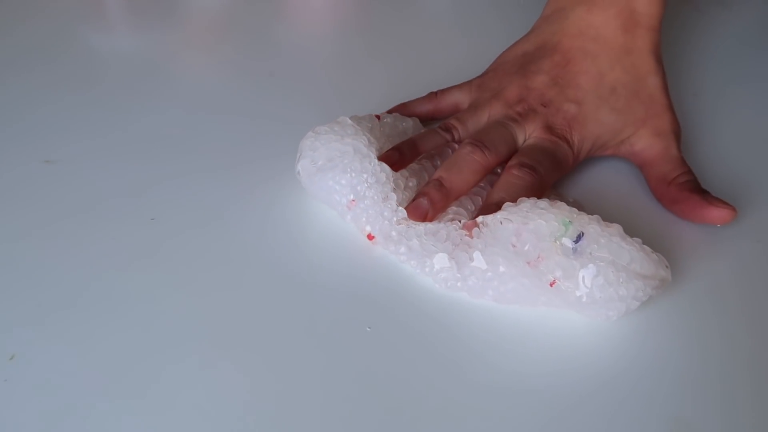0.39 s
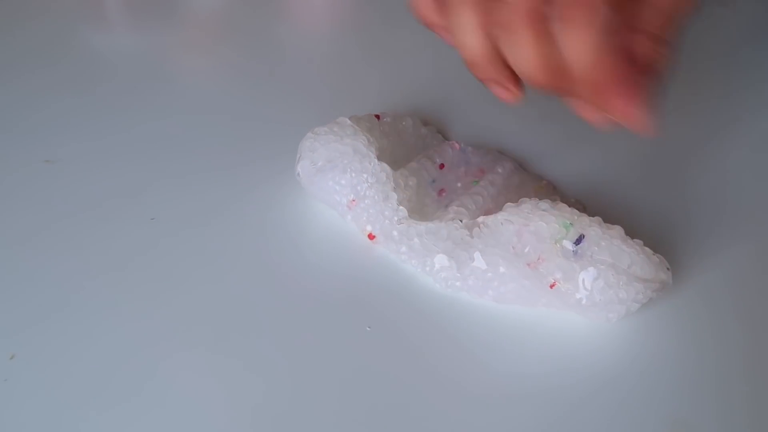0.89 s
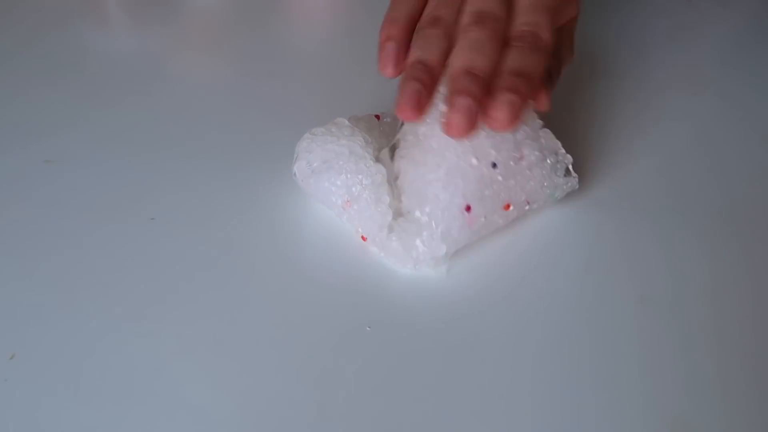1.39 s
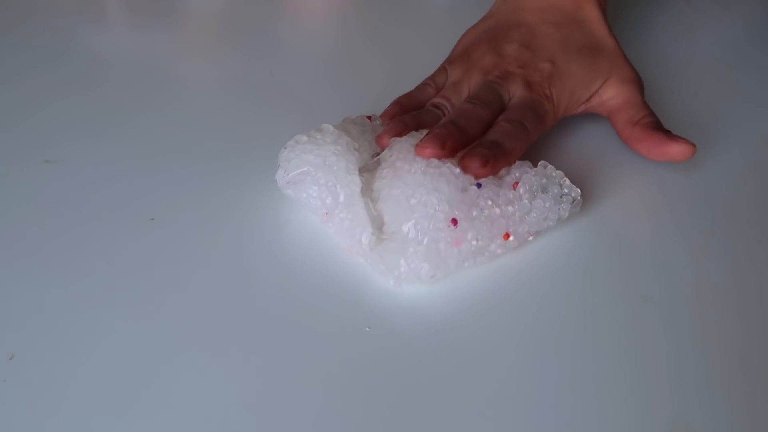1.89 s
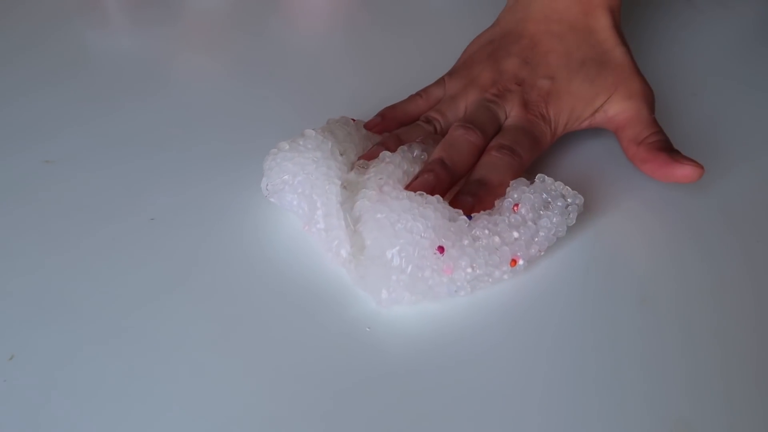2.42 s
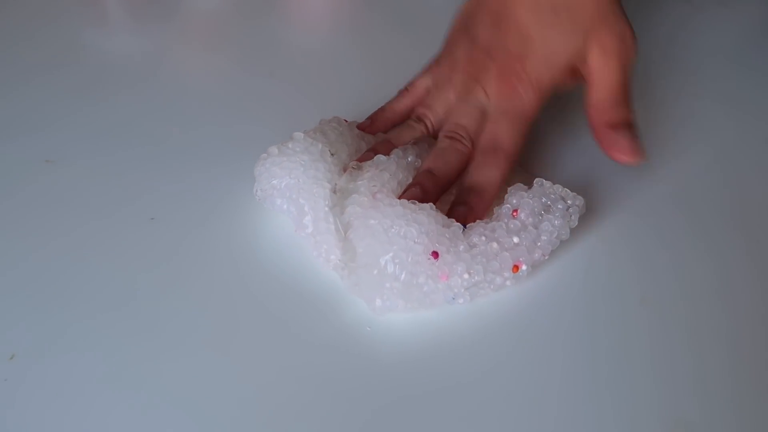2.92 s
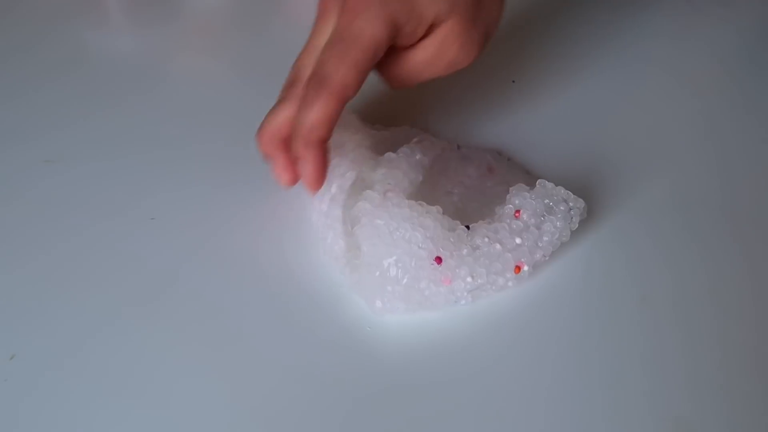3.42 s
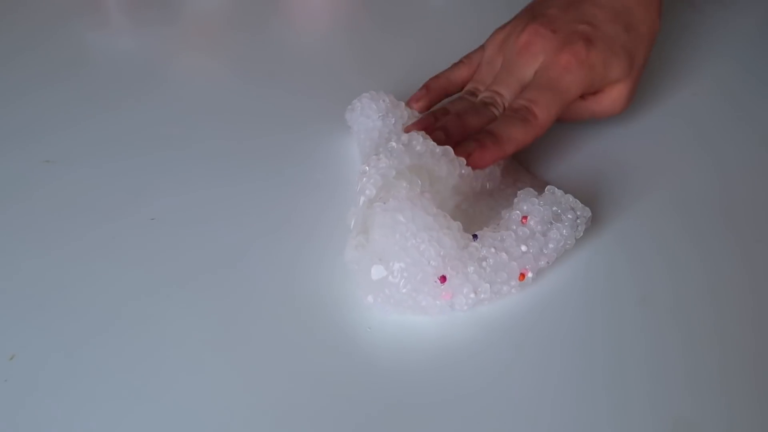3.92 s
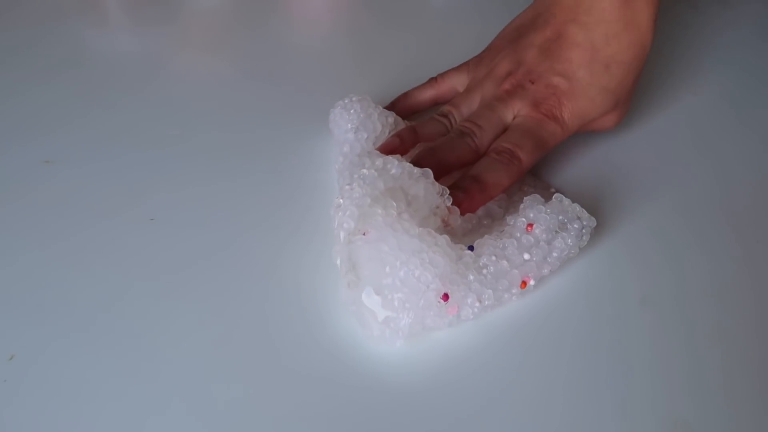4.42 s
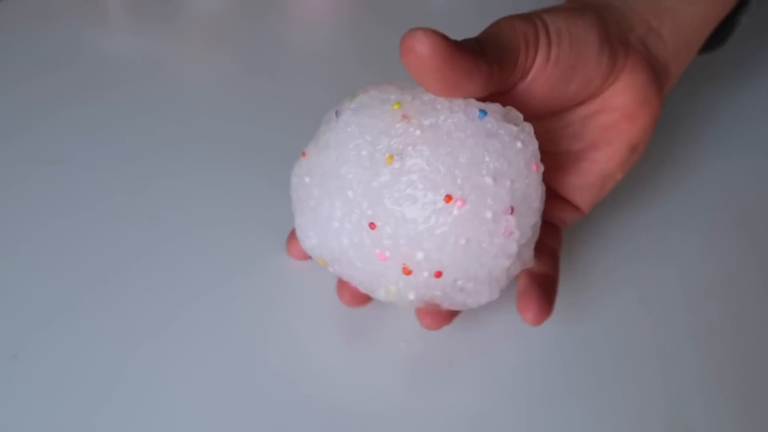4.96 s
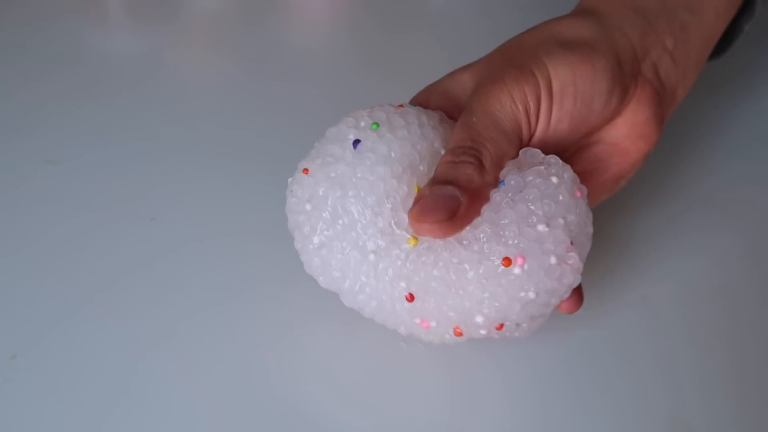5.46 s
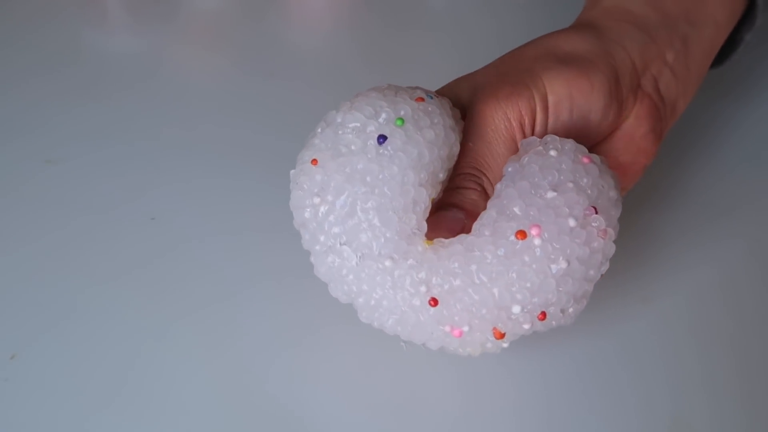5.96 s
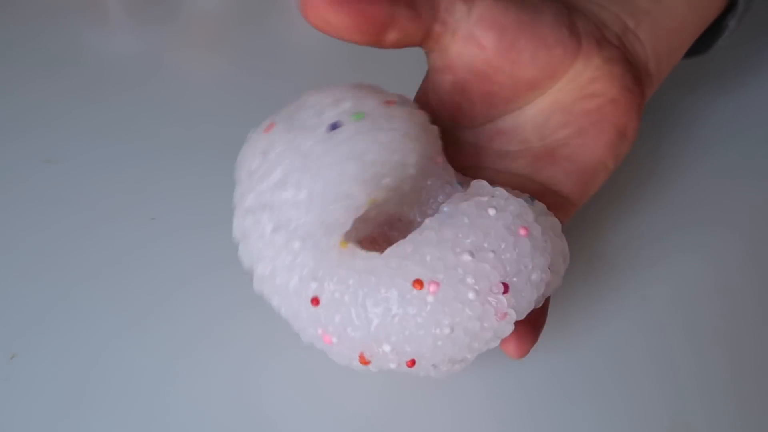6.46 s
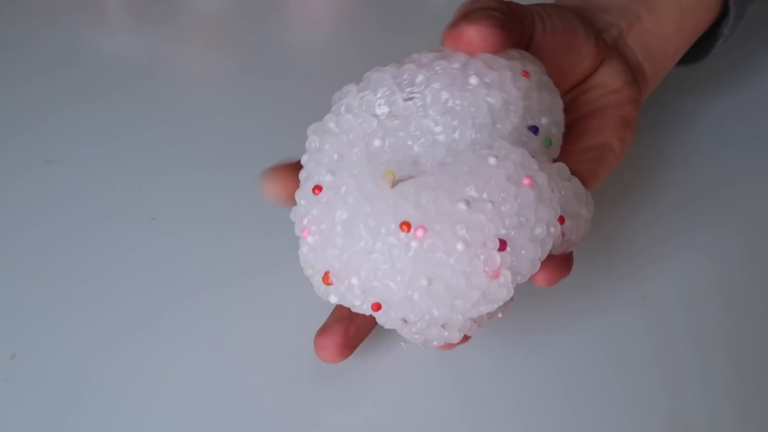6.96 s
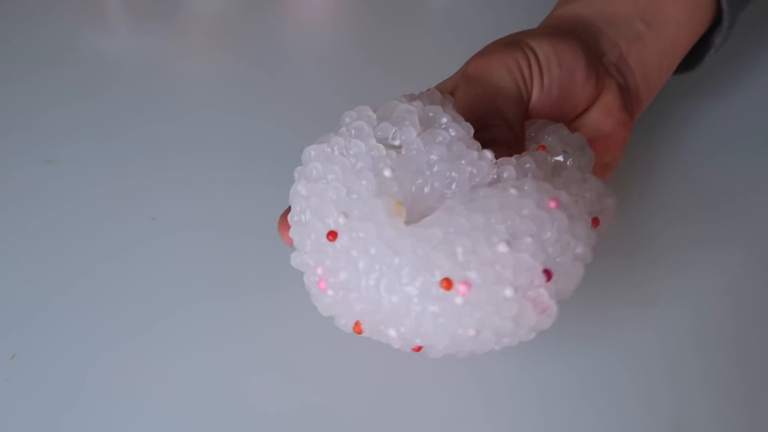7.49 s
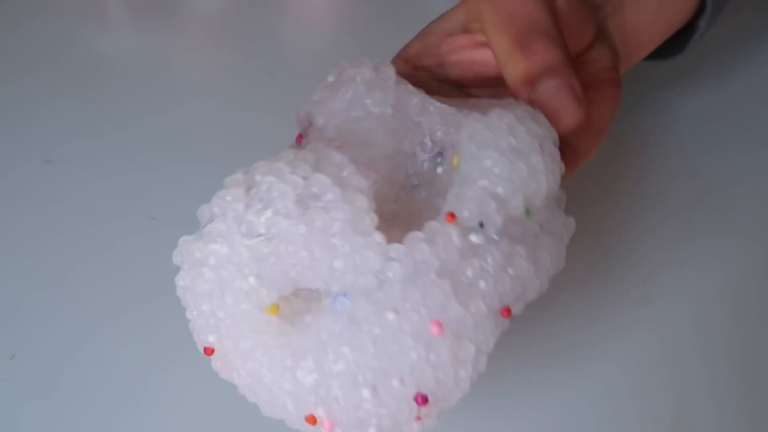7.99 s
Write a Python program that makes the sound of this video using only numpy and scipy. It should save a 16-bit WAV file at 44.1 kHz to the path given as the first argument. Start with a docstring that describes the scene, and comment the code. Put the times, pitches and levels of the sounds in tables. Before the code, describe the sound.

Irregular bright clicks and sticky crackling from beady slime worked by hand on a table, with low bumps, squelches and faint hiss.

```python
"""Bead-filled slime worked by hand

A hand presses, folds and peels bead-filled slime on a table, close to a microphone.
Bursting air pockets pop as damped resonators with noise snaps; parting threads crackle as many tiny rings
over a fizz; folds and torn pockets pass air as band noise; peels shake and knock the table.
A small room reflects the sound over hiss and hum; a splice cuts off earlier pulls and reverberation."""
import sys
import numpy as np
from scipy import signal
from scipy.fft import rfft, irfft, next_fast_len
from scipy.io import wavfile
from scipy.ndimage import map_coordinates

SR = 44100
rng = np.random.default_rng(int(sys.argv[2]) if len(sys.argv) > 2 else 0)


def gain_from_decibels(decibels):
    """Convert decibel values to linear amplitude factors."""
    exponent = np.asarray(decibels, float) / 20
    return 10 ** exponent


def put_to_file(sound):
    """Save the sound as 16-bit audio at rate SR, in the file named by the first command-line argument."""
    columns = np.atleast_2d(sound).T  # one column per channel
    safe = np.clip(columns, -1, 1)
    whole_steps = np.round(safe * 32767)
    wavfile.write(sys.argv[1], SR, whole_steps.astype(np.int16))


N = 357651
SPLICE_S = 4.861  # where two moments are joined


def unit(x):
    """Normalisation: scales a signal to rms 1."""
    return x / np.sqrt(np.mean(x ** 2) + 1e-20)


def filtered(x, response):
    """Linear filtering: multiplies the spectrum by a response of frequency."""
    size = next_fast_len(len(x) + 8192)
    spectrum = rfft(x, size) * response(np.fft.rfftfreq(size, 1 / SR))
    return irfft(spectrum, size)[:len(x)]


def colour(points):
    """Spectral envelope: gain interpolated between (Hz, dB) points on a log frequency axis."""
    f, db = np.transpose(points)
    return lambda hz: gain_from_decibels(np.interp(np.log(hz + 1), np.log(f + 1), db))


def resonance(centre_hz, half_width_hz, order):
    """Band-pass resonance: gain 1 at the centre, one half at half_width_hz to either side."""
    return lambda f: 1 / (1 + ((f - centre_hz) / half_width_hz) ** order)


def wobble(rate):
    """Random modulation: a smooth curve through rate random knots a second."""
    knots = rng.standard_normal(int(N * rate / SR) + 4)
    return map_coordinates(knots, [np.arange(N) * rate / SR])


def place(s, shapes):
    """Superposition: sums short shapes, one row each, at their times in seconds."""
    at = np.round(s * SR).astype(int)[:, None] + np.arange(shapes.shape[1])
    return np.bincount(at.ravel(), shapes.ravel(), N + SR)[:N]


def rings(hz, cycles, rise, size):
    """Damped oscillation: sines under envelopes of peak 1, whose decay reaches -60 dB after so many cycles."""
    turn = hz[:, None] * np.arange(size) / SR
    envelope = gain_from_decibels(-60 * turn / cycles) * (1 - np.exp(-turn / rise)) ** 2
    return np.sin(2 * np.pi * turn) * envelope / envelope.max(axis=1, keepdims=True)


def hand(column, lag_s=0):
    """Energy addition: kneading and pulls add in power; column 0 is crackle, 1 table shake, 2 sway."""
    # slow kneading: (time [s], crackle [dB], table shake [dB], sway [dB])
    kneading = np.array([(0, -58.5, -55, -44.5), (0.55, -61.5, -59.5, -53.5), (0.72, -52.5, -51, -58),
                         (0.95, -63, -50.5, -41), (1.1, -68, -56, -56), (1.3, -50.5, -50.5, -48),
                         (2.1, -53, -54, -55.5), (2.5, -56.5, -58, -50.5), (2.9, -58, -58.5, -51),
                         (3.15, -64, -53, -41), (3.38, -67.5, -68, -50), (3.65, -50.5, -47.5, -51),
                         (4.2, -53.5, -54, -44.5), (4.7, -62, -49, -52.5), (4.9, -61, -57, -53),
                         (6.2, -61.5, -62, -55), (6.5, -50, -58, -44), (6.95, -60, -59, -51),
                         (7.8, -55, -62, -55), (8.11, -53.5, -58, -50.5)])
    # peels, folds and presses: (full from [s], held [s], crackle [dB], table shake [dB], sway [dB])
    pulls = [(0.743, 0.088, -36.5, -28, -41), (1.095, 0.045, -64, -44, -38), (1.165, 0.077, -46, -32, -37),
             (1.295, 0.11, -61, -37, -45), (2.905, 0.033, -51.5, -48, -57),
             (2.979, 0.057, -35, -26.5, -37.5), (3.33, 0.032, -64.5, -54.5, -34),
             (3.414, 0.027, -56, -31.5, -48), (3.46, 0.12, -45.5, -36.5, -45), (4.07, 0.023, -63, -48, -42),
             (4.748, 0.035, -36, -21.5, -37), (6.345, 0.069, -37, -55.5, -44.5),
             (6.675, 0.035, -56, -52, -32.5), (6.76, 0.077, -73, -54, -39.5), (6.996, 0.016, -43, -43, -42),
             (7.866, 0.049, -34, -55, -46), (7.955, 0.052, -38, -57, -41)]
    # how fast a pull sets in: (crackle [dB/s], table shake [dB/s], sway [dB/s])
    rise = [552, 1300, 400]
    # how fast it dies after letting go: (crackle [dB/s], table shake [dB/s], sway [dB/s])
    fall = [707, 253, 106]
    t = np.arange(N) / SR
    power = gain_from_decibels(np.interp(t, kneading[:, 0], kneading[:, column + 1])) ** 2
    for start, held, *db in pulls:
        s = start + lag_s
        before = np.maximum(s - t, 0)
        after = np.maximum(t - s - held, 0)
        shape = gain_from_decibels(db[column] - rise[column] * before - fall[column] * after)
        uncut = (t < SPLICE_S) | (s > SPLICE_S)
        power += (shape * uncut) ** 2
    return np.sqrt(power)


def pops():
    """Cavity resonance: each pocket rings; its film snaps and tears as noise and wet slime squelches below."""
    # larger bursting pockets:
    # (time [s], level [dB], cavity pitch [Hz], relative squelch level [dB], relative snap level [dB])
    large_pockets = [(0.0267, -28, 2770, -1, -24), (0.0457, -25, 5830, -11, -19),
                     (0.1444, -32, 2090, 4, -23), (0.1795, -27.5, 2430, -12, -27),
                     (0.3542, -12.5, 3740, -27, 3), (0.6538, -25.5, 6140, -10, -17),
                     (0.6974, -16, 14900, -5, -10), (0.7368, -19.5, 2100, 7, 14),
                     (0.7539, -8, 9800, -10, -7), (0.7605, -9, 10500, -1, -7),
                     (0.7676, -0.5, 13610, -22, 2), (0.773, -3, 14810, -19, -3),
                     (0.7781, -3.5, 7300, -12, 1), (0.7872, -4, 10600, -11, -1),
                     (0.808, 7.5, 10500, -24, 2.5), (0.8157, -6.5, 7200, 1, -1), (0.821, -4, 9100, -9, 4),
                     (1.1965, -14, 6550, -4, 2), (1.208, -14, 6540, -13, -2), (1.2158, -17, 7490, 2, -8),
                     (1.2322, -15, 2560, -1, -18), (1.242, -12.5, 3730, -14, 11),
                     (1.2506, -12.5, 10400, -22, 7), (1.2963, -11.5, 7060, 1, 3),
                     (1.3205, -12.5, 5170, -5, -6), (1.3247, -2.5, 6940, -31, 9),
                     (1.3344, -7, 13350, -30, -3), (1.348, -11.5, 4660, -4, -18),
                     (1.358, -0.5, 15070, -17, -5), (1.3707, -4.5, 14990, -14, -10),
                     (1.3939, -20.5, 4100, 6, 15), (1.4421, -16.5, 4250, 4, 11),
                     (1.4804, -3.5, 4320, -20, 8), (1.4909, -21, 13180, -31, 15),
                     (1.5315, -6, 4100, -10, 0), (1.5486, -13.5, 7060, -25, -13),
                     (1.6166, -15.5, 13400, -36, 1), (1.627, -11, 9300, -28, -1),
                     (1.6387, -18, 4630, -13, -8), (1.6525, -11, 6000, -7.5, -2),
                     (1.6805, -16.5, 6030, -6, -13), (1.7535, -20.5, 3600, -8, -19),
                     (1.7724, -13, 10100, -26, -6), (1.8049, -15, 7300, -3.5, -14),
                     (1.8535, -24, 2650, 2, 10), (1.8681, 1, 5350, -13, -2), (1.9183, -19, 11200, -21, -4),
                     (1.9423, -13.5, 8440, -11, -11), (1.961, -12, 10850, -24, -6),
                     (1.984, -18, 9730, -23, -6), (2.0553, -21, 2540, 0, -26), (2.2637, -26, 11000, -10, 0),
                     (2.3412, -24, 8800, -23, -23), (2.39, -18.5, 6950, -27, -16),
                     (2.399, -19, 3550, -3, -33), (2.591, -24.5, 3420, 2.5, 12),
                     (2.6141, 2.5, 6360, -41, 2), (2.7806, -20.5, 8100, -12, 0),
                     (2.7979, -24, 4400, -21, -16), (2.9027, -28.5, 2440, 2, -24),
                     (2.9115, -22.5, 2500, 3.5, 5), (2.9446, -19.5, 11600, -5, -8),
                     (2.9593, -18, 15420, -22, 2), (2.9827, -13, 6400, -20, 8),
                     (2.9938, 2.5, 13800, -32, 6), (3.0024, -8.5, 4830, -12, -14),
                     (3.011, -3.5, 7490, -3.5, -15), (3.0133, -2, 13780, -30, -2),
                     (3.022, 1.5, 8700, -15, 8), (3.0251, -1.5, 6040, -17, -5),
                     (3.0384, -19, 5040, 6.5, -11), (3.3803, -30, 2200, -3.5, 1),
                     (3.4089, -13.5, 9900, -10, -2), (3.4204, -15, 9000, 3, 4),
                     (3.4631, -11, 10400, -28, 11.5), (3.4924, -15, 13700, -2, -5),
                     (3.5168, -17, 6460, 1, 1), (3.5274, -14, 7100, -2, 2), (3.6954, -9, 8200, -7, -19),
                     (3.8155, -16, 7700, -16, 1), (3.8219, -17, 10900, -35, -4),
                     (3.9195, -11.5, 11000, -10, -4), (3.996, -17, 12400, -35, -11),
                     (4.0193, -17.5, 6980, -1, 7), (4.0413, -19, 7650, -17, 0),
                     (4.0608, -18, 5170, -9.5, 11), (4.1278, -12, 14700, -13, 11.5),
                     (4.2023, -10, 10300, -10, -2), (4.2374, -24, 14900, -17.5, -11.5),
                     (4.336, -31, 2120, 5, -24), (4.4335, -21, 7300, -17, -4), (4.5047, -25, 1250, -2, -21),
                     (4.5505, -10, 3970, -10.5, -24), (4.5896, -14, 5700, -9.5, -5),
                     (4.6812, -23, 1570, -6, -29), (4.7415, -19, 10340, -4, -2),
                     (4.7512, 1.5, 13780, -19, -5), (4.7644, -6, 7300, -25, -9.5),
                     (4.7684, 5.5, 7500, -24, -18), (4.7731, 1, 14640, -26, -4),
                     (4.788, -11, 9900, -18, -5), (4.7923, -9, 11710, -27, -5), (4.8006, 0, 5250, -31, -4),
                     (4.9624, -21.5, 2930, -15.5, 12.5), (5.1853, -10, 13600, -27, -4),
                     (5.2375, -19.5, 3400, -12, 15), (5.3809, -9, 9000, -24, 8),
                     (5.5445, -15.5, 9040, -8, 12), (5.594, -32, 1200, -15, -15),
                     (5.6566, -25.5, 7100, -5.5, 5), (5.6882, -24, 9080, 1, 4),
                     (5.7819, -25.5, 3800, -23, 4), (6.1414, -26.5, 9200, -18, -5),
                     (6.3485, -12.5, 3860, -8, 9), (6.377, -11.5, 2612, 6.5, -15),
                     (6.564, -25, 9390, -7, 7), (6.5918, -20, 9040, -5.5, 2), (6.8823, -26, 8270, -8, 1),
                     (6.9325, -9, 15400, -14.5, -1), (6.9929, -6, 11420, -18, -3),
                     (6.997, -13.5, 13630, -2, -18.5), (7.0058, -11, 13180, -1.5, -6.5),
                     (7.1361, 2.5, 4340, -17, -57), (7.1618, -20, 7500, -17, -15),
                     (7.1837, -17, 8700, -30, 3), (7.2045, -22, 4900, -14.5, 4),
                     (7.2535, -18.5, 4900, -1, -22), (7.3924, -8, 13700, -15.5, -1),
                     (7.438, -23, 12830, -25, -4), (7.4833, -31, 2410, -10, -22),
                     (7.5091, -24, 7380, -15, 5), (7.6523, -20, 8180, -9, -6),
                     (7.7372, -9.5, 7640, -15, -19), (7.848, -22.5, 9000, -10, 8),
                     (7.8727, -17, 7800, -15, 11), (7.8856, -14, 9640, -4, 12),
                     (7.903, -12, 3060, -19.5, -5), (7.907, -8, 9820, -3, -14),
                     (7.9356, -12, 11100, -35, 1), (7.952, -15, 2600, -19, -4), (7.9598, 0, 8550, -21, 1),
                     (7.9625, 3.5, 8500, -17.5, -6), (7.9771, 2.5, 13200, -24, -5),
                     (7.9785, -3, 13000, -25, -6), (7.981, -2, 8610, -11.5, -9),
                     (8.0072, -5, 14900, -20, -11), (8.0113, -6.5, 11890, -14, 7.5)]
    s, db, hz, squelch_db, snap_db = np.transpose(np.vstack([large_pockets, small_pockets()]))
    t, chance = np.arange(300) / SR, rng.standard_normal((len(s), 610))

    cavity = gain_from_decibels(db - 1.0)[:, None] * rings(hz, cycles=6.0, rise=0.48, size=300)
    squelch_hz = 1800 * gain_from_decibels(3.12 * chance[:, 600])
    squelch = gain_from_decibels(db + squelch_db - 6.0)[:, None] * rings(squelch_hz, cycles=3.9, rise=0.21, size=300)

    burst = gain_from_decibels(-60 * t / 0.0032) * (t / 0.00043) ** 1.55 / (1 + (t / 0.00036) ** 1.38)
    film_s = s - .0002  # the film gives way just before the cavity rings
    snap = place(film_s, gain_from_decibels(db + snap_db + 1.0)[:, None] * burst * chance[:, :300])
    tear = place(film_s, gain_from_decibels(db + 0.37 * snap_db - 5.5)[:, None] * burst * chance[:, 300:600])
    snap = filtered(snap, colour([(6000, -19.0), (9000, 3), (16000, -13.5)]))
    tear = filtered(tear, colour([(800, -15.0), (3000, 5.5), (16000, 12.5)]))

    # three neighbouring pockets give way just after each one
    near_s = s[:, None] + .005 * np.abs(chance[:, 601:604])
    near_hz = np.clip(hz[:, None] * gain_from_decibels(4.18 * chance[:, 604:607]), 1500, 15500)
    near_db = db[:, None] - 20 + 4 * chance[:, 607:]
    near_rings = rings(near_hz.ravel(), cycles=8.6, rise=1.0, size=150)
    near = place(near_s.ravel(), gain_from_decibels(near_db.ravel())[:, None] * near_rings)
    return place(s, cavity + squelch) + near + snap + tear


def small_pockets(most=600):
    """Thinned Poisson process: pocket rows for pops(), denser and stronger where the slime crackles more."""
    busiest_per_s = 45
    over_crackle_db, spread_db, ceiling_db = 27.5, 3, -21.5
    untouched_db = -64  # under this crackle level no small pocket bursts
    busy_span_db = 12  # crackle rise from no small pockets to the busiest rate
    even, normal = rng.random((most, 2)), rng.standard_normal((most, 4))
    s = np.cumsum(-np.log(even[:, 0] + 1e-9)) / busiest_per_s
    crackle_db = 20 * np.log10(hand(column=0)[np.minimum(s * SR, N - 1).astype(int)])
    hz = np.clip(7500 * gain_from_decibels(4.85 * normal[:, 1]), 2000, 15300)
    height = np.log10(hz / 7500)
    db = np.minimum(crackle_db + over_crackle_db + spread_db * normal[:, 0], ceiling_db)
    db = db + 14 * np.minimum(height, 0)  # deep pockets are muffled
    squelch_db = -14 - 14 * height + 6 * normal[:, 2]
    snap_db = -5 + 14 * height + 5 * normal[:, 3]
    bursts = even[:, 1] * busy_span_db < crackle_db - untouched_db
    return np.transpose([s, db, hz, squelch_db, snap_db])[(s < N / SR) & bursts]


def crackle(count=14000):
    """Acoustic emission: countless small threads part as damped rings of unequal size over a wet fizz."""
    # fizz colour: (frequency [Hz], gain [dB])
    fizz_colour = [(410, -53), (700, -1.5), (1260, 1), (2560, 0), (7390, -6.5), (8420, -4), (10800, -7),
                   (16000, -2.5)]
    when, pitch, size = rng.random(count), rng.standard_normal(count), rng.exponential(size=count)
    hz = np.clip(7500 * gain_from_decibels(5 * pitch), 900, 15500)
    # deep threads are damped by the slime around them
    size_db = 5 * np.minimum(size, 4.2) + 8 * np.log10(hz / 7500)
    threads = gain_from_decibels(size_db)[:, None] * rings(hz, cycles=5.7, rise=0.8, size=200)
    ticks = unit(place(when * N / SR, threads))
    fizz = unit(filtered(rng.standard_normal(N), colour(fizz_colour))) * gain_from_decibels(4.0 * wobble(150))
    return hand(column=0) * (gain_from_decibels(-0.5) * ticks + gain_from_decibels(-3.5) * fizz)


def squish():
    """Flow noise: air pressed out of a wet fold gurgles in one narrow band of unsteady level."""
    # folds: (full from [s], held [s], level [dB], band centre [Hz])
    folds = [(.685, 0.011, -53, 1800), (1.2, .06, -42, 620), (1.215, .04, -45, 3200),
             (6.385, 0.052, -51, 620), (6.36, 0.074, -52, 2420), (6.53, 0.194, -53.5, 2260),
             (6.69, .1, -44, 300), (7.866, 0.043, -45.5, 590), (7.885, 0.027, -42, 2700)]
    edge_db_per_s = 507  # fade at both ends
    half_width = 0.17  # of the band, over its centre frequency
    t, out = np.arange(N) / SR, np.zeros(N)
    for s, held, db, hz in folds:
        outside = np.maximum(s - t, 0) + np.maximum(t - s - held, 0)
        band = filtered(rng.standard_normal(N), resonance(hz, half_width * hz, order=2))
        out += gain_from_decibels(db - edge_db_per_s * outside + 5.7 * wobble(60)) * unit(band)
    return out


def leaks():
    """Jet noise: a torn pocket keeps spitting air in a band around its pitch, dying exponentially."""
    # air fizzing out after a burst: (time [s], level [dB], band centre [Hz], 60 dB decay time [s])
    torn_pockets = [(5.237, -36.5, 9600, 0.23), (5.546, -42.5, 9000, .2), (7.138, -35, 4430, 0.39)]
    t, out = np.arange(N) / SR, np.zeros(N)
    for s, db, hz, t60 in torn_pockets:
        spit = gain_from_decibels(5.1 * wobble(400)) * rng.standard_normal(N)
        band = unit(filtered(spit, resonance(hz, 0.22 * hz, order=2)))
        out += (t > s) * gain_from_decibels(db - 60 * np.abs(t - s) / t60) * band
    return out


def table():
    """Forced vibration: jolts knock the table top, sticky pulls shake it in lumps, and the stand sways."""
    # jolts of the table: (time [s], level [dB], pitch [Hz])
    jolts = [(0.5329, -34.5, 427), (1.1, -28.5, 82), (1.1364, -27, 87), (2.5962, -30.5, 660),
             (2.9147, -32.5, 192), (3.0584, -14, 263), (3.3247, -32.5, 117), (3.421, -16.5, 301),
             (4.0635, -30, 110), (4.5056, -16, 288), (4.68, -25.5, 720), (5.003, -29, 302),
             (5.345, -34.5, 123), (5.594, -36.5, 554), (6.6746, -11.5, 257), (6.9983, -30, 189.7),
             (7.891, -27, 624)]
    # table top colour: (frequency [Hz], gain [dB])
    top_colour = [(60, -18), (110, -6.5), (205, 0), (330, -4), (600, -8), (900, -13.5), (1800, -22.5),
                  (4000, -32)]
    # colour of the sway under the microphone: (frequency [Hz], gain [dB])
    sway_colour = [(13, -42), (22, 3.5), (43, 14.5), (70, 1), (120, -7.5), (160, -42), (260, -120)]
    s, db, hz = np.transpose(jolts)
    t = np.arange(5000) / SR
    push = place(s - .0006, gain_from_decibels(db + 1.6)[:, None] * rings(hz, cycles=5.5, rise=0.085, size=5000))
    hardness = np.exp(-2.5 * np.log(hz / 300) ** 2)  # jolts near the table's own pitch rattle it most
    envelope = gain_from_decibels(-60 * t / 0.045) * (1 - np.exp(-t / 0.0036))
    bursts = (hardness * gain_from_decibels(db + 8.0))[:, None] * envelope * rng.standard_normal((len(s), 5000))
    rattle = filtered(place(s, bursts), colour(top_colour))

    lumps = gain_from_decibels(3.2 * wobble(70)) * rng.standard_normal(N)
    shake = hand(column=1) * unit(filtered(lumps, colour(top_colour)))
    sway_noise = unit(filtered(rng.standard_normal(N), colour(sway_colour)))
    sway = hand(column=2, lag_s=0.015) * sway_noise  # the stand answers pulls late
    return push + rattle, shake + sway


def room(x, wet_db):
    """Reflection and reverberation: near surfaces return copies, then each frequency decays at its own rate."""
    # reflected sound: (frequency [Hz], 60 dB decay time [s], gain [dB])
    decay = [(200, 0.35, 0.5), (820, 0.49, 7.5), (3000, 0.37, 0), (6000, 0.3, -6), (9000, 0.21, -6),
             (15000, 0.05, -27)]
    # table and near surfaces: (delay [s], level [dB])
    surfaces = [(.0015, -33), (.0026, -24), (.0055, -23), (.013, -24), (0.0174, -40)]
    f, t60, reflected_db = np.transpose(decay)
    dull = filtered(x, colour(list(zip(f, reflected_db))))  # soft surfaces swallow the treble
    out = x.copy()
    for delay, db in surfaces:
        out += gain_from_decibels(db) * np.pad(dull, (round(delay * SR), 0))[:N]
    step = SR // 4
    for start in range(0, N, step):  # the hand moves, so the tail keeps changing
        hz, t, z = signal.stft(rng.standard_normal(SR // 2), SR, nperseg=256)
        fade = gain_from_decibels(-60 * t / np.interp(hz, f, t60)[:, None])
        tail = signal.istft(z * fade, SR, nperseg=256)[1]
        wet = signal.fftconvolve(dull[start:start + step], tail / np.linalg.norm(tail))
        # blocks that start well before the splice lose their tail there
        cut = round(SPLICE_S * SR) if start < SPLICE_S * SR - step / 2 else N
        out[start + 180:cut][:len(wet)] += gain_from_decibels(wet_db) * wet[:max(cut - start - 180, 0)]
    return out


def air():
    """Stationary noise: steady room air and microphone hiss with a faint, narrow, wavering hum in it."""
    # hiss colour: (frequency [Hz], gain [dB])
    hiss_colour = [(35, -34), (60, 3.5), (173, -10), (318, -39), (546, -12.5), (1540, -23), (1690, -17),
                   (1990, -20), (2580, -23), (2970, -23), (6450, -24.5), (15000, -23), (16500, -40)]
    # hum: (band centre [Hz], half width [Hz], level [dB])
    hum_bands = [(170.6, 12, -62)]
    hiss = gain_from_decibels(-58) * unit(filtered(rng.standard_normal(N), colour(hiss_colour)))
    hum = np.zeros(N)
    for hz, half_width_hz, db in hum_bands:
        band = filtered(rng.standard_normal(N), resonance(hz, half_width_hz, order=4))
        hum += gain_from_decibels(db) * unit(band)
    return hiss + hum


def scene():
    """Superposition: slime and knocks sound in the room; shake, sway and air reach the microphone directly."""
    knocks, shake = table()
    slime = pops() + crackle() + squish() + leaks()
    mix = room(slime, wet_db=-18.5) + room(knocks, wet_db=-12.0) + shake + air()
    return mix[None]


def low_pass(x):
    """Removes everything above the highest recorded frequency."""
    return signal.sosfilt(signal.butter(12, 16850, fs=SR, output="sos"), x)


def record(dry):
    """Band limiting and clipping: the microphone fades at the very top and peaks clip at full scale."""
    heard = filtered(dry[0], colour([(15700, -1.5), (16300, -19), (17000, -38)]))
    clipped = np.clip(heard, -1, 1)[None]
    return low_pass(clipped)


dry = scene()
out = record(dry)
put_to_file(out)
```